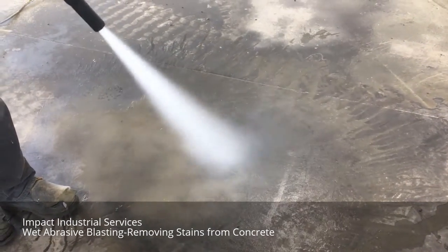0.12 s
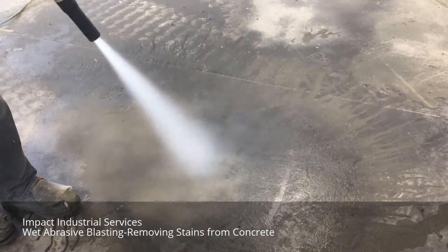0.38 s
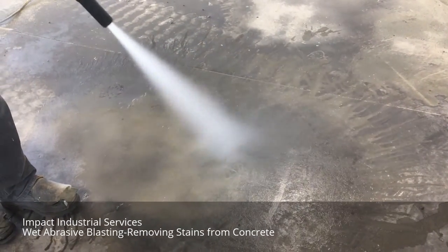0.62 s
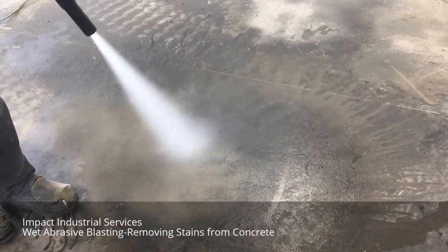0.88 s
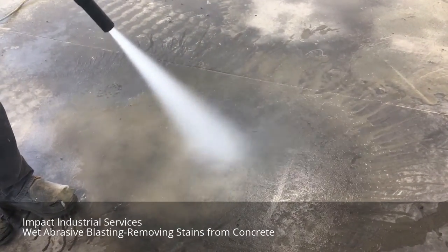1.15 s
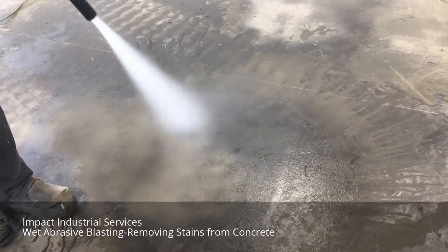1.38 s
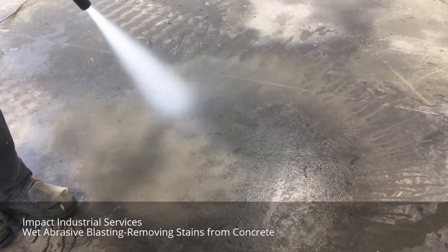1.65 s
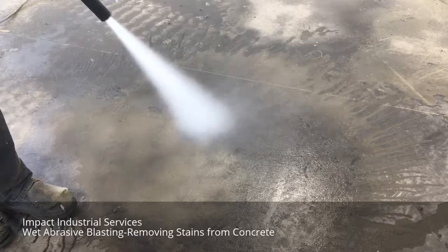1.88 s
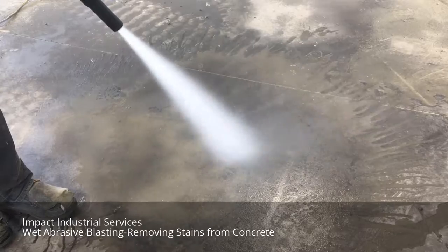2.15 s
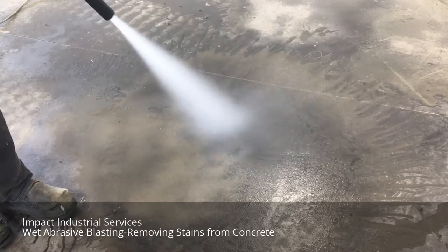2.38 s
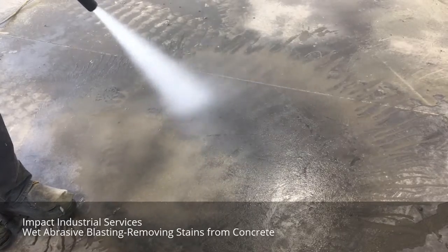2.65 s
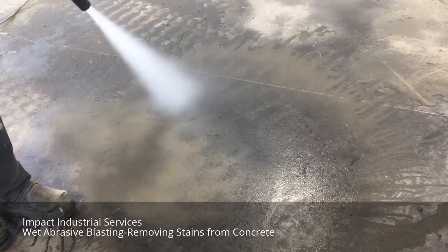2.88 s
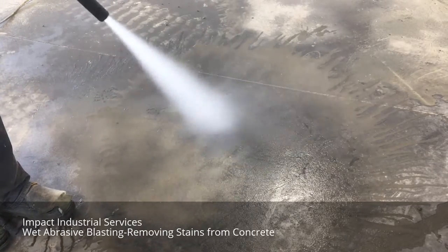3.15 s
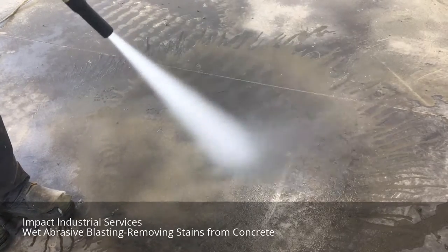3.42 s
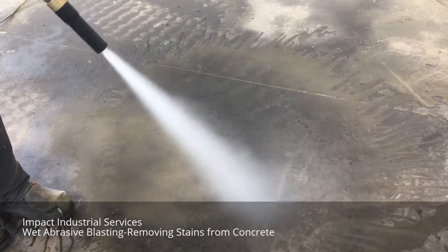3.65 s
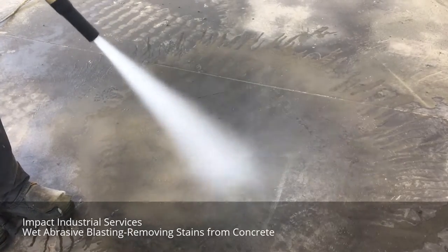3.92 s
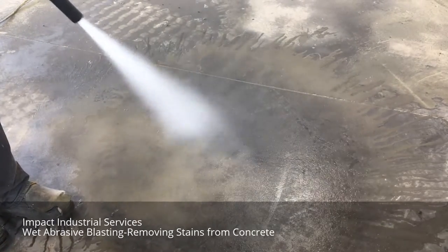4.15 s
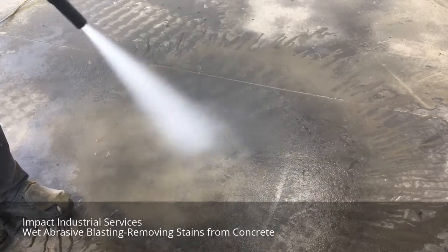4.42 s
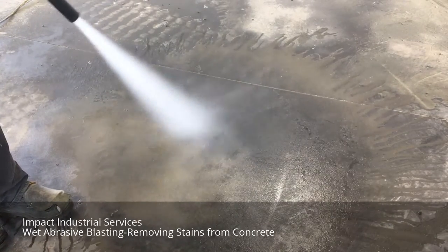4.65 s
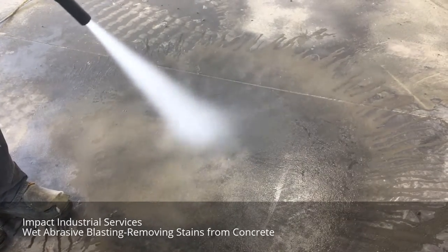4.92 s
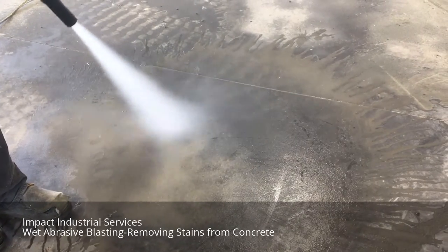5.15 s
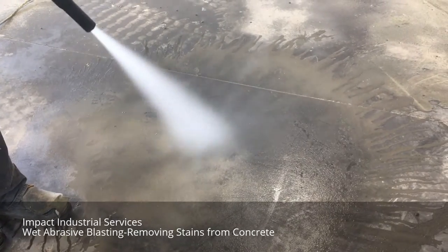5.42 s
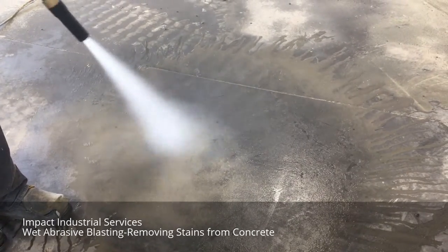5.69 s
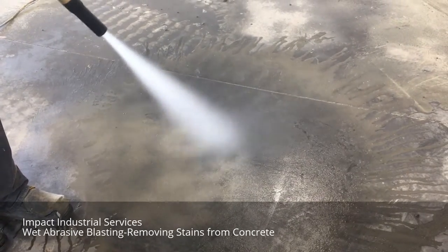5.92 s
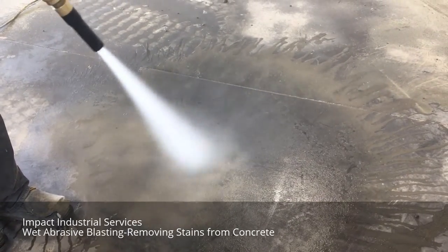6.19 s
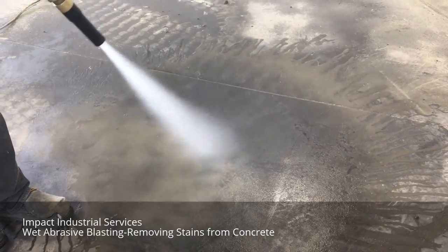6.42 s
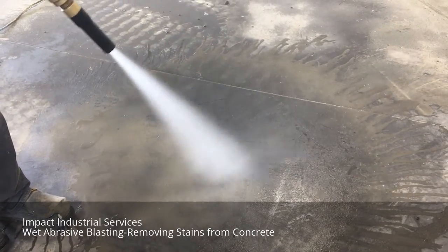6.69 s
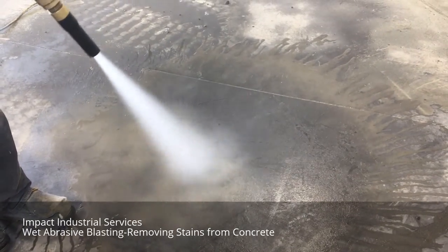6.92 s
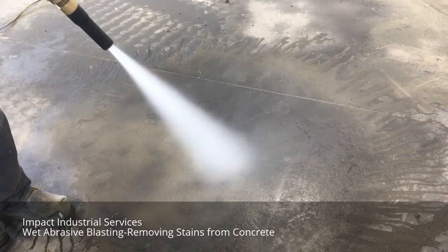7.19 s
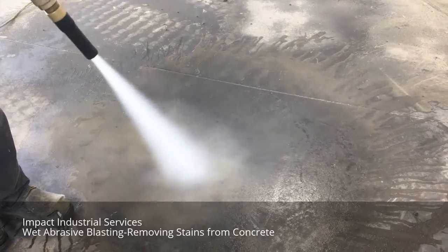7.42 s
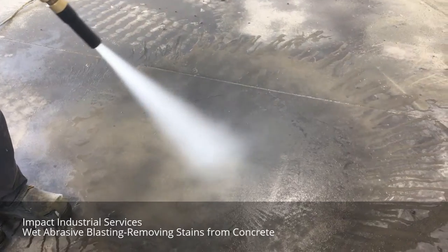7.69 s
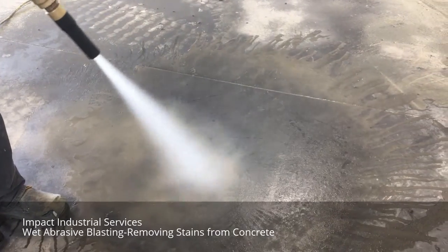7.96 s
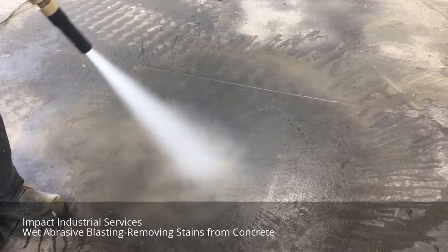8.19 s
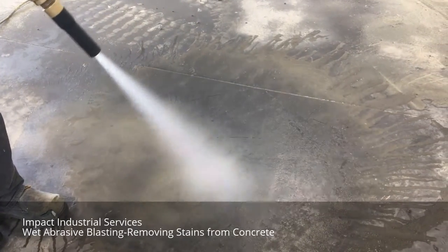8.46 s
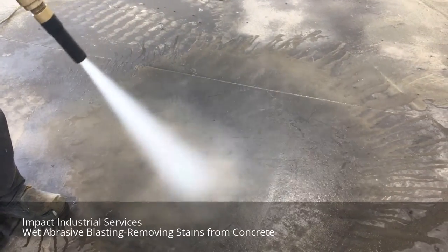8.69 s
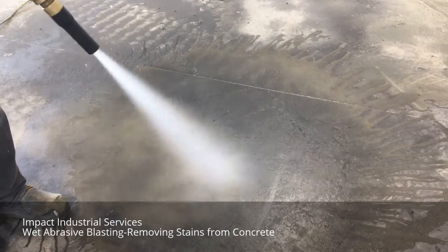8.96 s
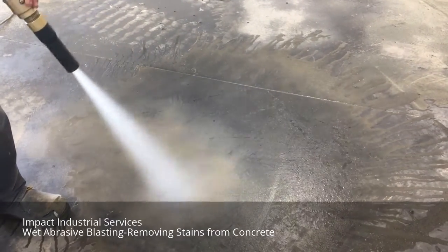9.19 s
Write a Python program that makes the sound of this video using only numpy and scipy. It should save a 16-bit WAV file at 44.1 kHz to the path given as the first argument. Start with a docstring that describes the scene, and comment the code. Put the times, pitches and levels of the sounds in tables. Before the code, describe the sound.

Continuous dense spray noise, loud and close, already running at the start and never stopping. It flickers with tiny quick dropouts and surges slowly as the nozzle swings over the wet floor. A compressor whines on a fixed pitch farther off, with faint engine hum and machine wash. Low, dull droplet bumps hit the single microphone, most clearly in the first moment and after eight seconds.

```python
"""Slurry blasting on wet concrete

A nozzle blasts air, water and grit onto a wet floor close to one microphone: coloured noise in three
layers (roar, hiss, fizz), surging with the feed and the sweep of the nozzle. Further off a compressor
whines (stacked rotor harmonics), its engine hums (two sines) and the shop gives a steady wash (noise).
Drops thump on the microphone (low-cut pushes)."""
import sys
import numpy as np
from scipy import signal
from scipy.io import wavfile
from scipy.ndimage import uniform_filter1d

SR = 44100
rng = np.random.default_rng(int(sys.argv[2]) if len(sys.argv) > 2 else 0)


def makeup_ratio(level_db):
    """Linear amplitude ratio for a level in decibels (20 dB per factor of ten)."""
    decades = np.asarray(level_db, float) / 20
    return 10 ** decades


def log_audio(samples):
    """Write samples as a 16-bit WAV file to the path given in sys.argv[1]."""
    # one column per channel
    frames = np.atleast_2d(samples).T
    # limit to full scale, then quantise
    limited = np.clip(frames, -1, 1)
    pcm = np.round(limited * 32767).astype(np.int16)
    wavfile.write(sys.argv[1], SR, pcm)


N = 411453  # 9.33 s


def evened(x):
    """Scales to unit rms."""
    return x / np.sqrt(np.mean(x ** 2) + 1e-20)


def read_spectrum(points, hz):
    """Interpolates a (Hz, dB) spectrum on a log-frequency axis; silent outside it."""
    point_hz, point_db = np.transpose(points)
    return np.interp(np.log(hz + 1), np.log(point_hz + 1), point_db, left=-90, right=-90)


def wander(t, low_hz, high_hz):
    """Slow random motion: 30 sines of random phase, unit rms together."""
    rates_hz = np.geomspace(low_hz, high_hz, num=30)
    return evened(sum(np.sin(2 * np.pi * (hz * t + rng.random())) for hz in rates_hz))


def noise(colour_db, patchy_db, size):
    """Random short-time spectra of the given colour with drifting patches, unit rms."""
    frames = 4 * N // size + 6
    real, imag, patches = rng.standard_normal((frames, size // 2 + 1, 3)).T
    patches = uniform_filter1d(patches, size=6, axis=0)  # across frequency
    patches = evened(uniform_filter1d(patches, size=8, axis=1))  # across time
    colour = colour_db(np.fft.rfftfreq(size, 1 / SR))[:, None]
    spectra = (real + 1j * imag) * makeup_ratio(colour + patchy_db * patches)
    return evened(signal.istft(spectra, nperseg=size, noverlap=3 * size // 4)[1][:N])


def sputter(per_s, depth_scale_db, recover_s):
    """Feed level in dB: at a gap it drops fast and creeps back; small gaps come at random."""
    # deepest gaps in the slurry feed: (start [s], depth [dB], time to deepest point [ms])
    gaps = [(0.03,4,9), (0.14,5.5,10), (0.18,9,30), (0.275,6.5,15), (0.337,6,7.8), (0.539,3,45),
            (0.715,8,21), (0.785,11,9.4), (1.117,7.5,9.3), (1.257,9,8.9), (1.377,9,7), (1.467,8,7.5),
            (1.56,2,17), (1.645,2.5,15), (1.746,4,14), (1.936,6.5,10), (2.185,6,34), (2.375,8.5,8.3),
            (2.444,3.2,31), (2.594,7,14), (2.846,2,11), (2.996,4.5,14), (3.2,4,21), (3.357,2.5,20),
            (3.472,3.5,20), (3.597,2.5,18), (3.801,4.5,28), (3.905,6.5,15), (3.973,7.5,14), (4.02,4,30),
            (4.19,7,60), (4.32,4,15), (4.61,3.5,26), (4.729,7,15), (4.89,2.5,18), (4.979,6,15),
            (5.068,4.5,64), (5.218,6,10), (5.378,3.5,15), (5.458,4.5,49), (5.677,4.5,17), (5.752,4.5,5.4),
            (5.996,6,19), (6.106,5.5,8.7), (6.263,3,8.7), (6.505,4.5,20), (6.652,5,8.9), (6.795,4.5,30),
            (6.924,6,12), (7.114,1.5,69), (7.194,4,40), (7.483,7.5,11), (7.615,2,9.2), (7.722,4,42),
            (7.957,2,9.3), (8.052,8,46), (8.171,4,15), (8.411,2.5,33), (8.58,7,45), (8.72,6,11),
            (8.89,6,14), (8.97,2.5,81), (9.129,4,16)]
    t = np.arange(N // 64 + 1) * 64 / SR
    struck = rng.random(len(t)) < per_s * 64 / SR
    small = struck * np.minimum(rng.exponential(1, len(t)), 2.4)
    small = signal.lfilter([1], [1, -np.exp(-64 / SR / recover_s)], small)
    small = uniform_filter1d(small, size=5)
    dips_db = depth_scale_db * (small - small.mean())
    for start_s, depth_db, deepest_ms in gaps:
        u = np.maximum(t - start_s, 0) * 1000 / deepest_ms
        dips_db += depth_db * u * np.exp(1 - u)
    return -np.interp(np.arange(N) / SR, t, dips_db)


def hiss_colour(hz):
    """Colour of the jet leaving the nozzle, bands of it cancelled by nearby surfaces."""
    # nozzle hiss: (frequency [Hz], relative density [dB])
    nozzle = [(2900, -26), (3040, -9), (3110, -3), (3500, -1), (4100, 1.5), (5300, -0.5), (7000, 0),
              (9200, -2), (11000, -6.5), (13300, -6.5), (14900, -10), (15400, -12.5), (17500, -17)]
    # cancelled bands: (centre [Hz], Gaussian width [Hz], gain [dB])
    cancelled = [(4800, 310, -3.5), (6074, 460, -6.5), (8170, 770, -4.5), (10380, 350, -3.5),
                 (12100, 400, -4)]
    notches_db = sum(db * np.exp(-((hz - f) / width_hz) ** 2) for f, width_hz, db in cancelled)
    return read_spectrum(nozzle, hz) + notches_db


def jet():
    """Nearness and feed drive three noise layers: floor roar, nozzle hiss and its top fizz."""
    # landing spot swings nearer and further: (time [s], nearness [dB])
    sweep = [(0, 3), (.55, 1), (.95, 1.5), (1.25, 0), (1.65, -5), (2.2, 1), (2.74, -4.5), (3.29, -0.5),
             (3.84, 3.5), (4.39, 0.5), (4.94, -1), (5.49, 0), (6.04, -1), (6.59, 0), (7.13, 1.5),
             (7.68, 0.2), (8.23, 3), (8.78, 3), (9.33, 3)]
    # nozzle mouth turns toward the microphone and away: (time [s], fizz gain [dB])
    aim = [(0, 1), (1.2, -0.5), (2.2, 0.5), (3.3, -0.5), (4.4, 2.2), (6.3, 1), (7.5, 0), (8.7, 0.5),
           (9.33, -1)]
    # impact on the floor: (frequency [Hz], relative density [dB])
    impact = [(200, -14.5), (450, -15.5), (900, -8.5), (1150, -6.5), (1400, 0.5), (1650, 0.5), (1950, 2),
              (2200, 0.5), (2450, -2), (2800, -8.5), (3000, -22), (3400, -35)]
    hiss_db, roar_db = -16.5, -25
    fizz_db = 0.45  # over the hiss
    roar_near, fizz_near = 1.01, 0.35  # dB per dB of nearness; hiss 1
    roar_feed = 0.86  # dB per dB of feed; hiss 1
    surge_db = 0.79  # rms

    t = np.arange(N) / SR
    near_db = np.interp(t, *np.transpose(sweep))
    aim_db = np.interp(t, *np.transpose(aim))
    feed_db = sputter(per_s=37, depth_scale_db=3.0, recover_s=0.0051)
    feed_db += surge_db * np.interp(t, t[::256], wander(t[::256], 3.5, 18))

    roar = noise(lambda hz: read_spectrum(impact, hz), patchy_db=1.03, size=1024)
    roar *= makeup_ratio(roar_db + roar_near * near_db + roar_feed * feed_db)

    hiss = noise(hiss_colour, patchy_db=1.1, size=1024)
    fizz = signal.sosfiltfilt(signal.butter(2, 10400, "high", fs=SR, output="sos"), hiss)
    hiss = (hiss - fizz) * makeup_ratio(near_db)
    fizz = fizz * makeup_ratio(fizz_db + fizz_near * near_db + aim_db)
    return roar + (hiss + fizz) * makeup_ratio(hiss_db + feed_db)


def compressor():
    """Rotor lobes give one smeared pulse each: a locked stack of lines, the high ones fuzzier."""
    # rotor whine: (harmonic number, peak level [dB])
    whine = [(1, -40), (2, -43.5), (3, -41.5), (4, -38.5), (5, -42.5), (6, -35.5), (7, -34), (8, -36.5),
             (9, -38.5), (10, -41.5), (11, -45), (12, -36.5), (13, -38.5), (14, -36.5), (15, -35.5),
             (16, -53), (17, -34)]
    rotor_hz, speed_waver = 262.4, 0.000414  # waver: rms fraction
    t = np.arange(N) / SR
    slow = t[::256]
    speed_hz = rotor_hz * (1 + speed_waver * np.interp(t, slow, wander(slow, .1, 2)))
    turns = np.cumsum(speed_hz) / SR
    turns += 0.011 * np.interp(t, slow, wander(slow, 1.5, 30))  # lobes arrive a little early or late
    out = np.zeros(N)
    for k, db in whine:
        level_db = db + np.interp(t, slow, 1.77 * wander(slow, 0.3045, 8))
        drift = (k / 15) ** 3 * 0.41 * np.interp(t, slow, wander(slow, 0.36, 25))
        smear = 0.028 * k ** 2  # rad
        out += makeup_ratio(level_db) * np.cos(2 * np.pi * k * turns + smear + drift)
    return out


def engine():
    """Firing rate and its double, nearly pure: two locked sines wavering in level and pitch."""
    firing_hz, pitch_waver = 64.6, 0.0033  # waver: rms fraction
    firing_db, firing_waver_db = -37.5, 1.1  # rms
    double_db, double_waver_db = -53, 1.3  # rms
    t = np.arange(N) / SR
    slow = t[::512]
    firing_db = firing_db + firing_waver_db * np.interp(t, slow, wander(slow, .3, 12))
    double_db = double_db + double_waver_db * np.interp(t, slow, wander(slow, .15, 1.505))
    hz = firing_hz * (1 + pitch_waver * np.interp(t, slow, wander(slow, 0.118, 1.88)))
    phase = 2 * np.pi * np.cumsum(hz) / SR
    return np.sqrt(2) * (makeup_ratio(firing_db) * np.sin(phase) + makeup_ratio(double_db) * np.sin(2 * phase))


def shop():
    """Steady air and machine wash: noise of fixed colour."""
    # wash: (frequency [Hz], relative density [dB])
    wash = [(25, -10), (50, -7), (90, -8), (170, -8.5), (300, -2.5), (450, -7.5), (700, -8.5), (1200, -1),
            (2500, -19), (6000, -13)]
    return makeup_ratio(-36.5) * noise(lambda hz: read_spectrum(wash, hz), patchy_db=1.3, size=4096)


def thump(sharp_hz):
    """A drop's push overshoots and holds; low cuts turn it into a falling swing of unit peak."""
    u = 2 * np.pi * sharp_hz * np.arange(4000) / SR
    push = (1 - .8 * u) * np.exp(-u) - 1
    low_cut = signal.butter(4, 54, "high", fs=SR, output="sos")
    swing = signal.sosfilt(np.tile(low_cut, (2, 1)), push)  # two in a chain
    return swing / abs(swing).max()


def thumps():
    """Large drops at set moments over a random patter of small ones."""
    # large drops: (time [s], peak level [dB], sharpness [Hz])
    large_drops = [(-.005, -18.5, 100), (.0743, -12, 520), (.479, -29, 90), (.501, -24, 300),
                   (4.596, -30, 120), (6.388, -29, 120), (7.954, -29, 150), (8.3553, -16.5, 350),
                   (8.4027, -18.5, 320), (8.539, -25, 16), (9.115, -29, 120), (9.270, -28, 120)]
    mist_per_s, mist_db, mist_spread_db = 10, -38.5, 2.2
    struck = rng.random(N) < mist_per_s / SR
    mist = struck * makeup_ratio(mist_db + mist_spread_db * np.clip(rng.standard_normal(N), -2, 1.6))
    out = signal.oaconvolve(mist, thump(sharp_hz=120))[:N]
    for at_s, db, sharp_hz in large_drops:
        swing = makeup_ratio(db) * thump(sharp_hz)[round(max(-at_s, 0) * SR):]  # before 0 s: already under way
        part = out[round(max(at_s, 0) * SR):][:len(swing)]
        part += swing[:len(part)]  # adds into out
    return out


def scene():
    """All sources meet at one microphone, fed to two equal channels."""
    return np.tile(jet() + compressor() + engine() + shop() + thumps(), (2, 1))


def roll_off(x):
    """The treble ends steeply here."""
    return signal.sosfilt(signal.butter(12, 16960, fs=SR, output="sos"), x)


def record(dry):
    """Soft overload of the input stage (tanh), then a steep band limit."""
    full_scale, edge_hz = .9, 15750
    bent = full_scale * np.tanh(dry / full_scale)
    band_limit = signal.firwin(2047, edge_hz, window=("kaiser", 10), fs=SR)
    mix = signal.oaconvolve(bent, band_limit[None], "same")
    return roll_off(mix)


dry = scene()
out = record(dry)
log_audio(out)
```